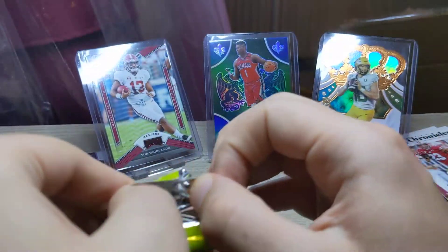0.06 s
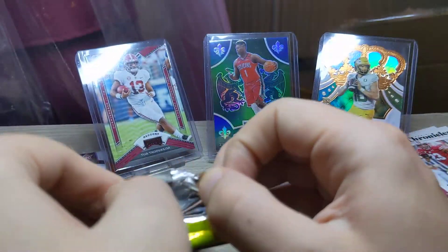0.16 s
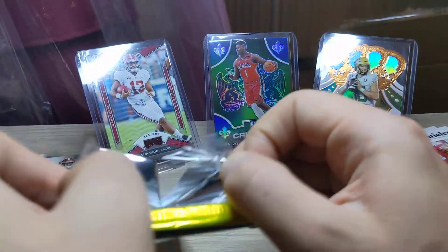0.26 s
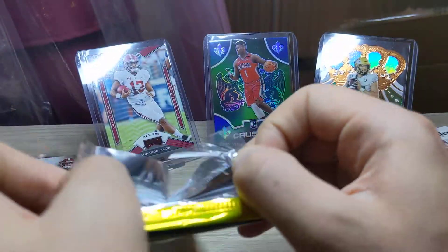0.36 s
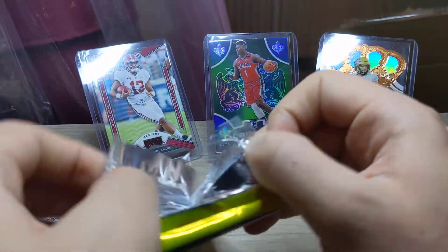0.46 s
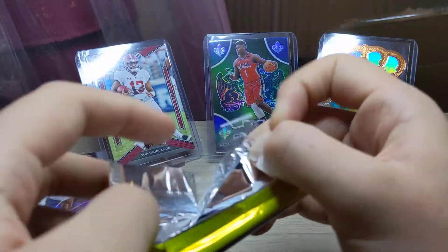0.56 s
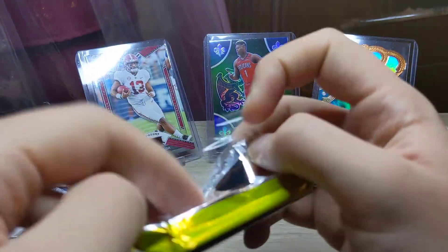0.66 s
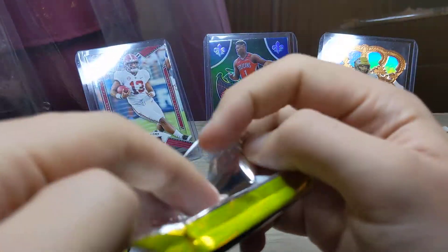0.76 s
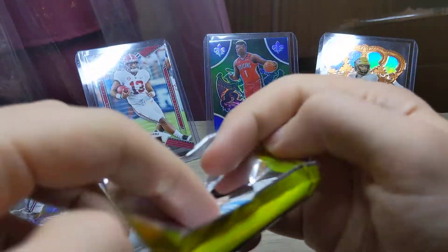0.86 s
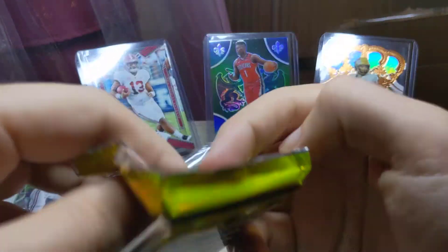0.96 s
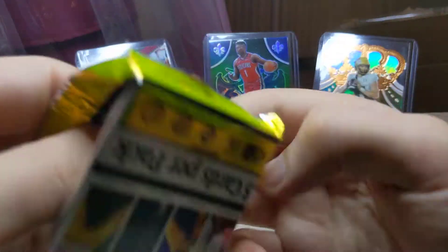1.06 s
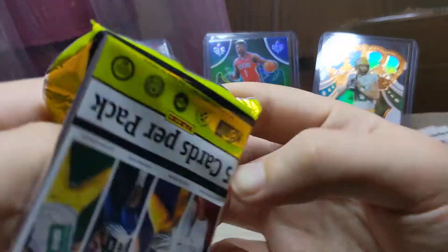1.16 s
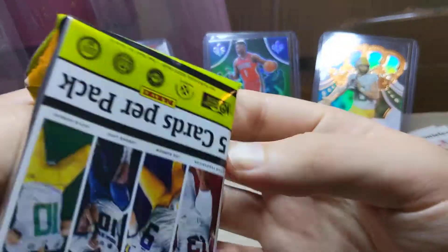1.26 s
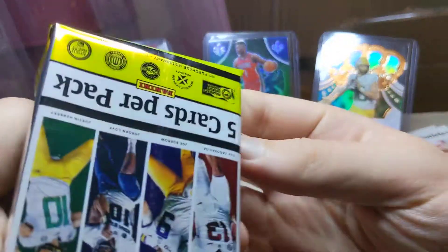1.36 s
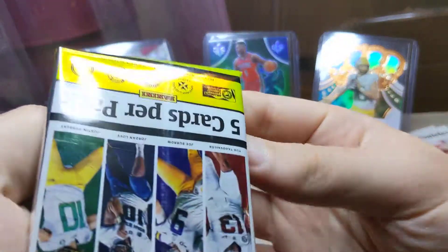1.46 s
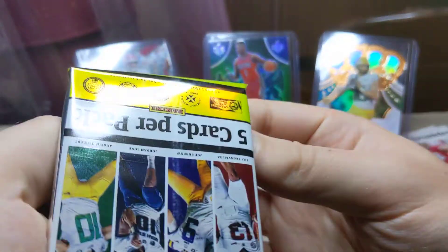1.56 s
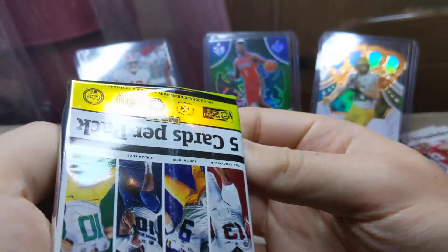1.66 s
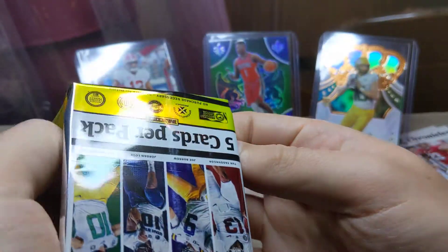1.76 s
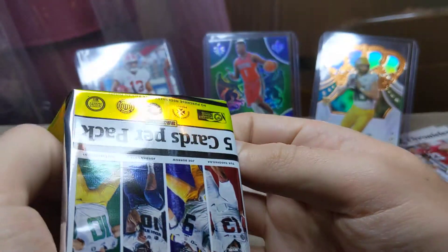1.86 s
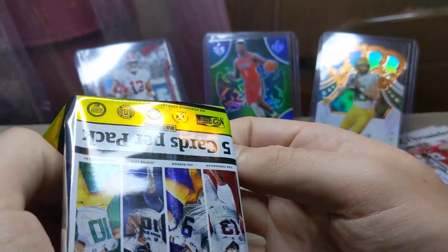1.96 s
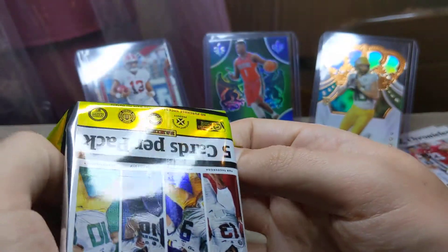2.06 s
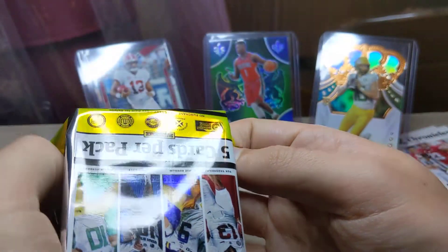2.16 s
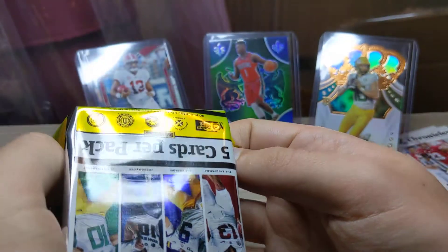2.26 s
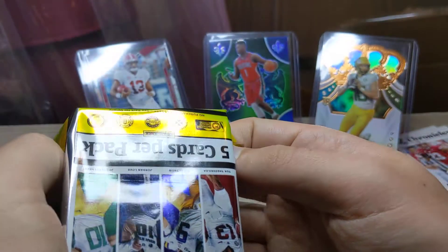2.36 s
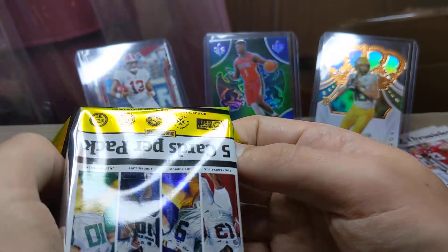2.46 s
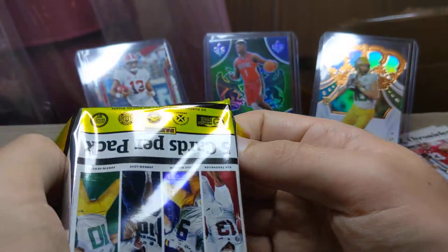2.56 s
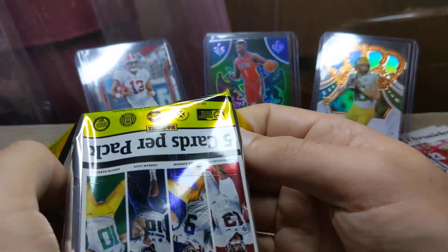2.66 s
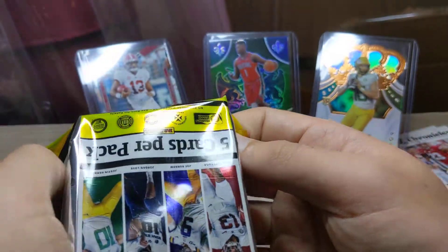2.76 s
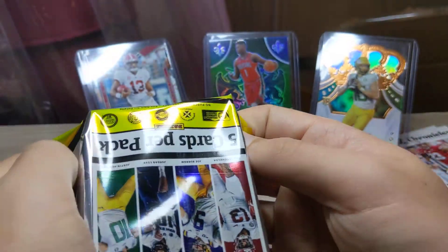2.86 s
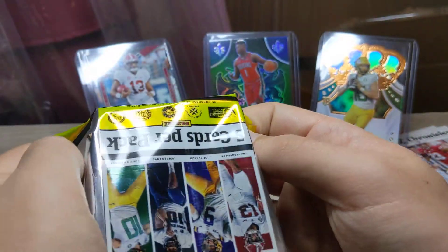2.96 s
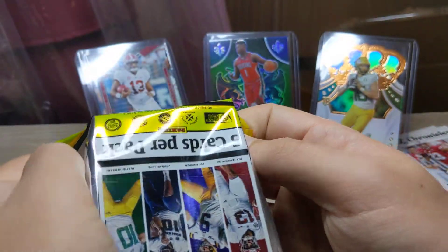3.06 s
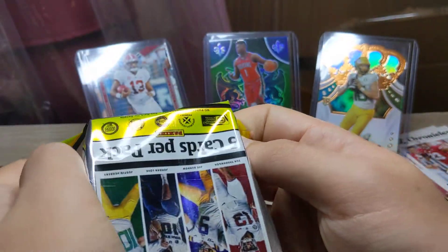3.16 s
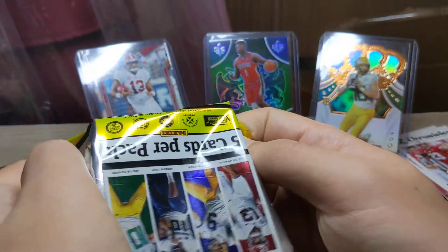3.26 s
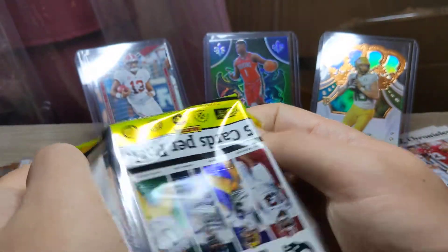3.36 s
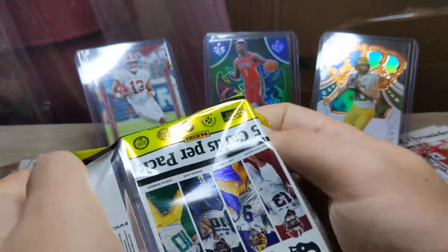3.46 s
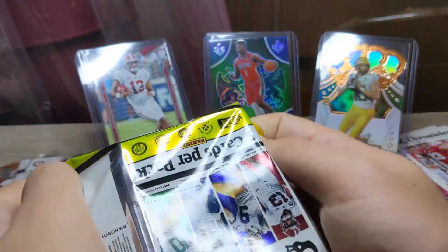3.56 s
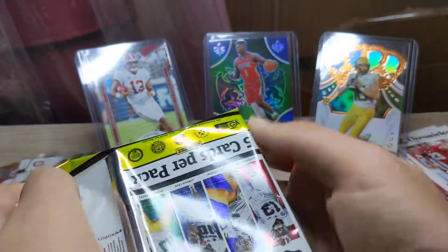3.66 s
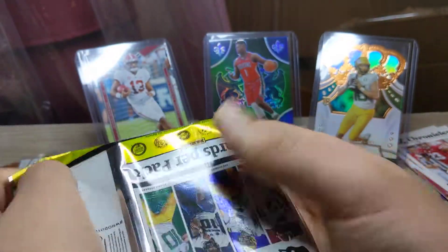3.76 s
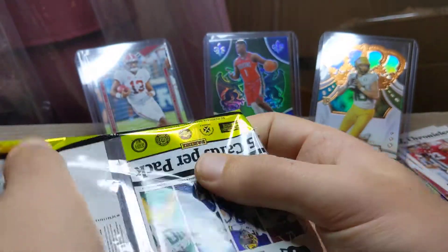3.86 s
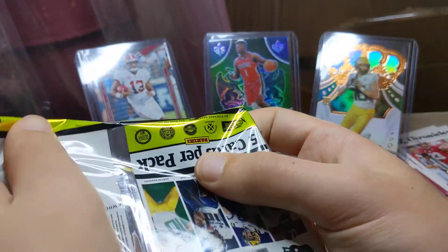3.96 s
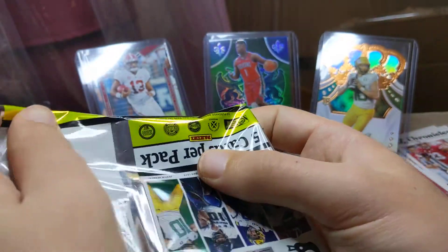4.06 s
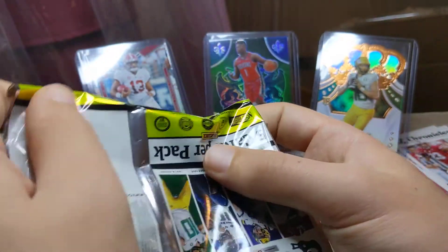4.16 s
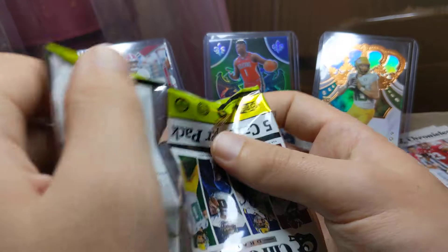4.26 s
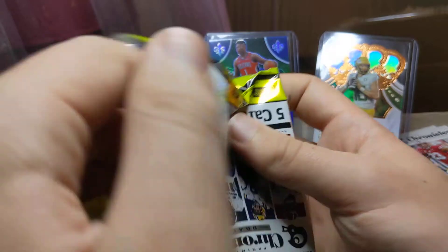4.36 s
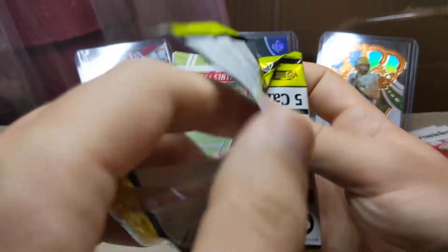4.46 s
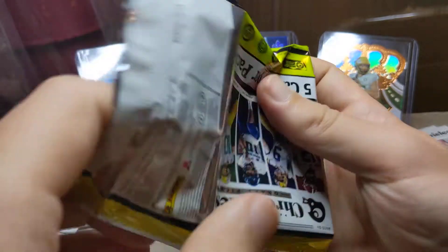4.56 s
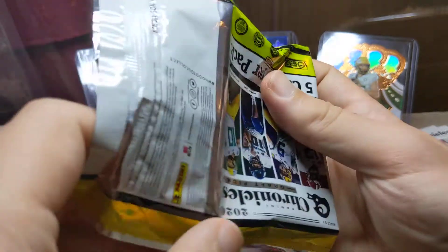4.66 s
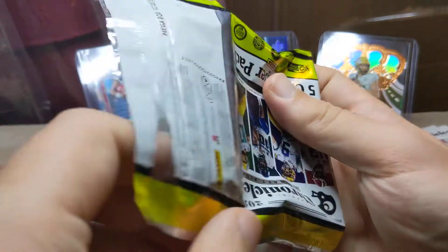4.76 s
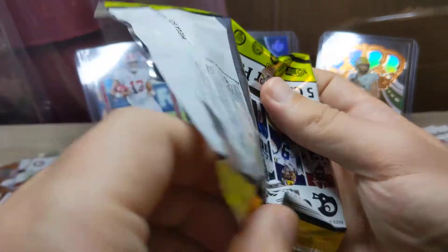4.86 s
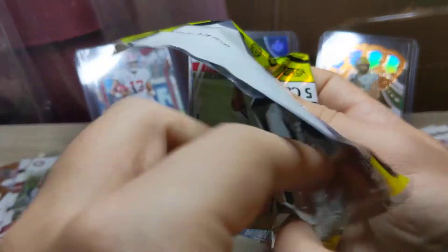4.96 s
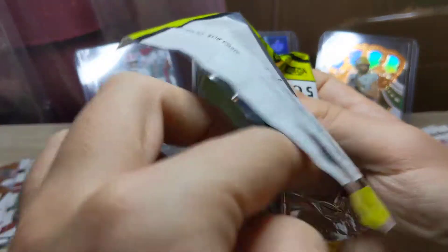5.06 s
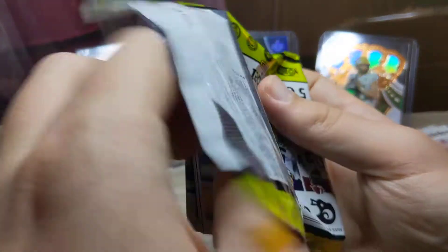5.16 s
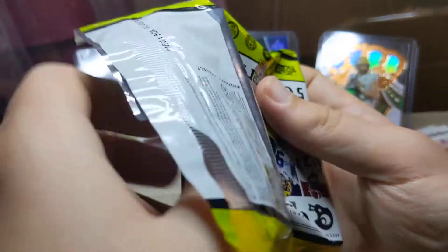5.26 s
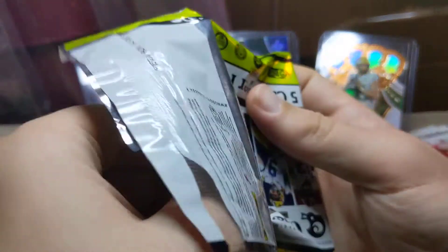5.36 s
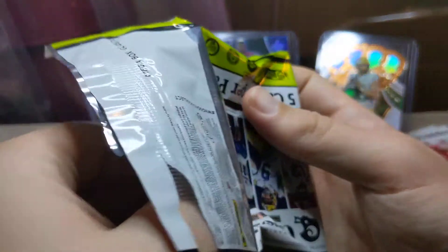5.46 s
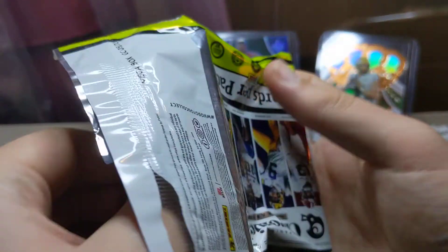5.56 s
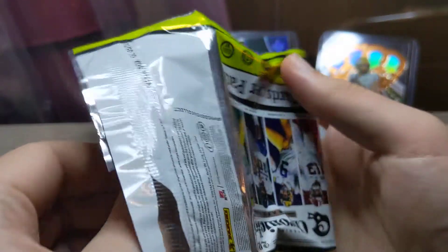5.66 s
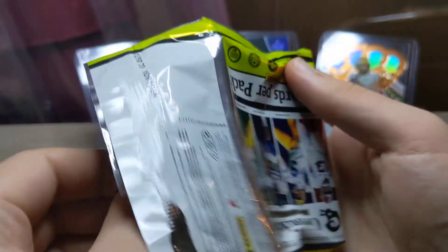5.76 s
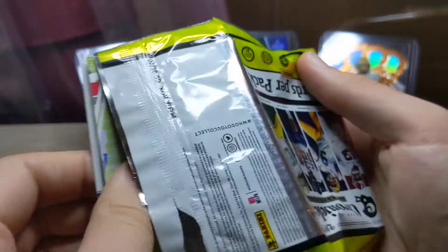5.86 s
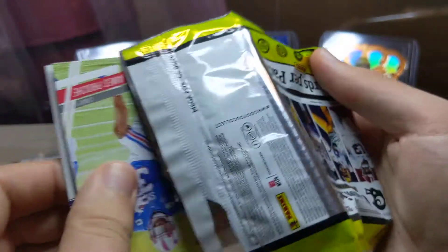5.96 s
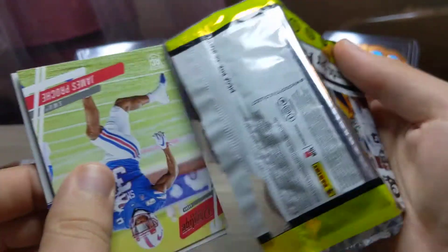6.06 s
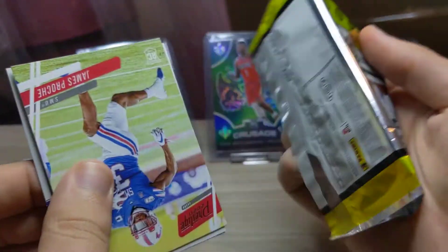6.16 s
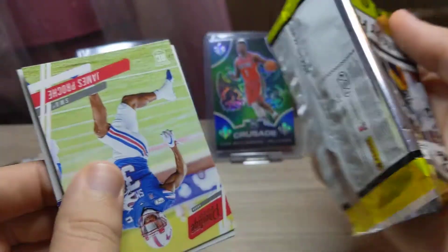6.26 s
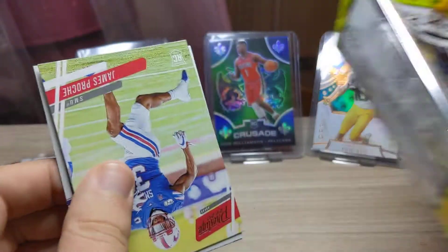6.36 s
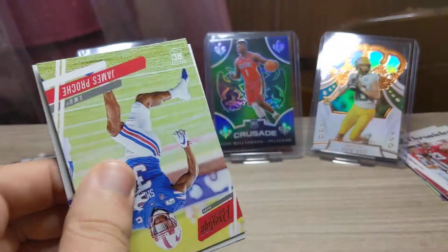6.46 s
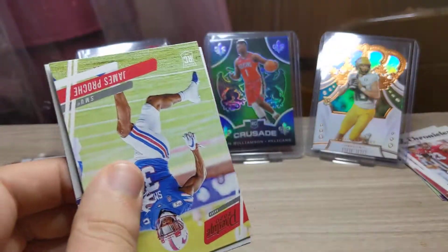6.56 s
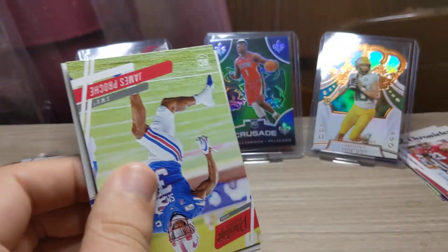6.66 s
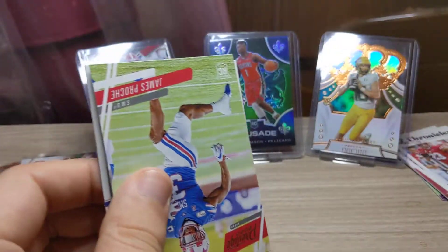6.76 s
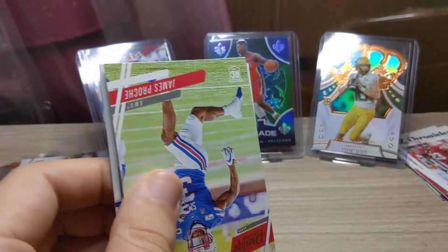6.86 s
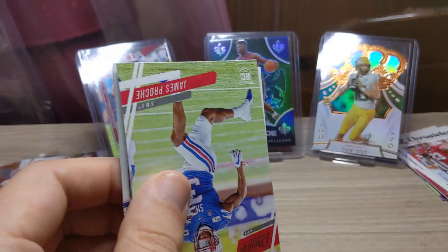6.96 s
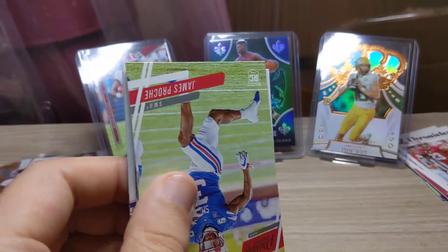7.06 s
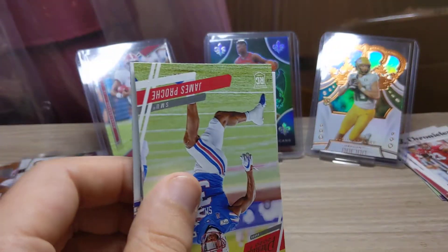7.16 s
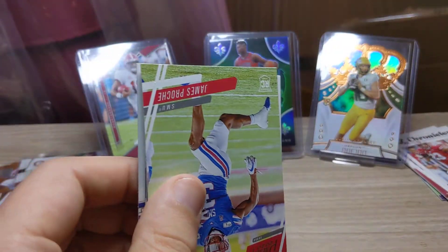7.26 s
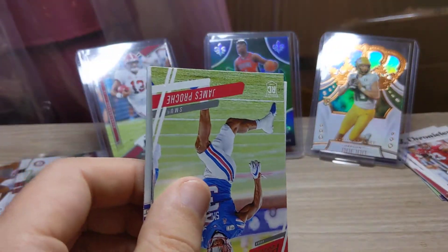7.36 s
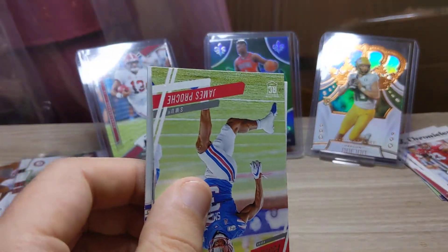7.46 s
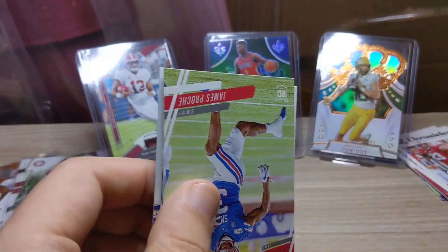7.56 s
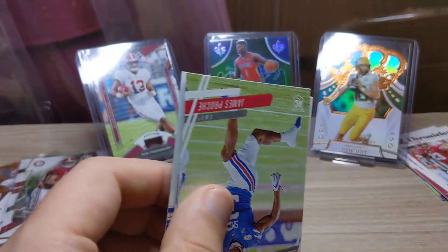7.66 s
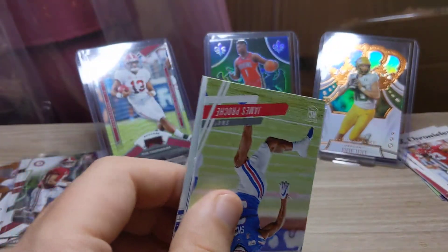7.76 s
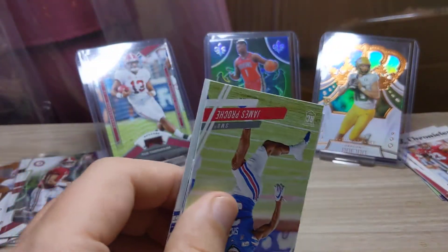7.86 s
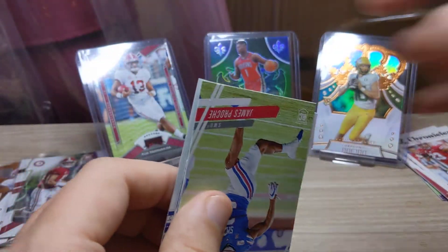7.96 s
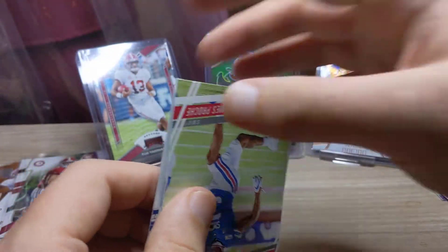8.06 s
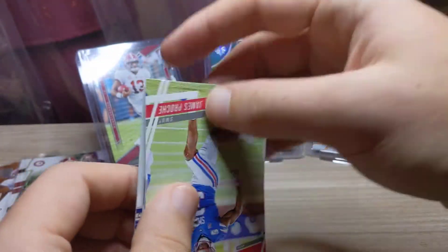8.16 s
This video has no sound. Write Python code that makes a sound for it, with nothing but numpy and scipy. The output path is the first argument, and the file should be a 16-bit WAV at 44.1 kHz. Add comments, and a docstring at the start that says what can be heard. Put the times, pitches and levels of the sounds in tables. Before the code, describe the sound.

Very close, dry stereo capture of foil packaging being opened. Quick bright ticks and hard cracks crowd the first few seconds, strongest as the packet is ripped. Lower soft thumps and rumbling flex join once it is open. Afterwards the foil only rustles lightly, leaning right for a moment, then nearly stops. One small muted card tap sounds before room rumble and hiss emerge.

```python
"""Hands tear and crumple a stiff foil pack close to a left and a right microphone port. Creases snap one by one
over a dense crackle of tiny noise bursts, the hollow pack answers lower down and a small room rings briefly.
After 3.5 s the torn pack gapes open and its walls flex with a low rumble. Later the foil is rubbed more than
crumpled, leaning to the right for a while. Near the end a stack of cards knocks softly, as a few fading tones
and a puff of noise, and the background rumble and hiss grow louder."""
import sys
import numpy as np
from scipy import signal
from scipy.fft import rfft, irfft, next_fast_len
from scipy.io import wavfile
from scipy.ndimage import map_coordinates

SR = 44100
rng = np.random.default_rng(int(sys.argv[2]) if len(sys.argv) > 2 else 0)


def generate_wav(signal):
    """Clip the signal to [-1, 1] and save it as 16-bit WAV at the path in sys.argv[1]."""
    frames = np.transpose(np.atleast_2d(signal))
    scaled = np.clip(frames, -1, 1) * 32767
    pcm = np.round(scaled).astype(np.int16)
    wavfile.write(sys.argv[1], SR, pcm)


N = 361619  # length in samples, about 8.2 s

# Low rumble and room hiss. Each row: time in seconds, rumble level in dB, hiss level in dB before a fixed lift.
AIR_LEVELS = [(0.0, -65, -79), (6.03, -70.5, -71), (8.2, -58, -65)]
# Colour of the low rumble. Each row: frequency in Hz, level in dB per Hz.
RUMBLE_COLOUR = [(12, -13), (22, 0.5), (29, -15), (42, -10.5), (58, -4), (90, -30), (200, -48.5)]
# Colour of the room hiss. Each row: frequency in Hz, level in dB per Hz.
HISS_COLOUR = [(47, -40.5), (80, -12.5), (240, -8), (500, -12), (940, -10), (1500, -16.5), (2200, -21),
               (5000, -36.5), (7500, -67), (11000, -40), (16000, -44)]
# How alike steady noise is at both ports. Each row: frequency in Hz, likeness from 0 to 1.
LIKENESS = [(60, .87), (300, .85), (700, 0), (15000, 0)]
# How fast the room falls silent. Each row: frequency in Hz, time to fall by 60 dB in seconds.
ROOM_DECAY = [(200, 0.19), (2000, 0.19), (12000, 0.029)]
# Taps of the card stack. Each row: start in seconds, level in dB.
CARD_TAPS = [(7.728, -21.5)]
# Tones of the card stack. Each row: frequency in Hz, level in dB, time to fall by 60 dB in seconds.
CARD_TONES = [(315, -6, 0.044), (460, -2.5, 0.04), (625, 9, 0.017), (1010, 12.5, 0.0049)]
# Fingers bump the pack, then the cards. Each row: start in seconds, level in dB before a fixed lift,
# starting pitch in Hz.
FINGER_BUMPS = [(0.856, -46, 149), (3.428, -38, 193), (3.94, -46, 64), (4.086, -41, 161), (4.15, -44, 75),
                (4.178, -40.5, 202), (4.305, -35, 101), (4.369, -38, 208), (4.403, -34, 330),
                (4.712, -43, 121), (4.773, -35.5, 181), (5.537, -45, 106), (5.722, -42.5, 79),
                (7.6, -41.5, 182)]
# Colour of the flexing walls. Each row: frequency in Hz, level in dB per Hz.
FLEX_COLOUR = [(40, -17), (80, -2.5), (350, 0), (600, -30)]
# Colour of the pack's body. Each row: frequency in Hz, level in dB per Hz.
PACK_COLOUR = [(60, -12), (200, -11.5), (450, -5.5), (700, -0.5), (1200, 0.5), (1900, -4.5), (4000, -31)]
# Colour of the foil sheet. Each row: frequency in Hz, level in dB per Hz.
SHEET_COLOUR = [(600, -38.5), (1500, -7), (2800, -4.5), (4800, -1), (6500, -6), (9000, -24.5)]
# Colour of the thin bright edges. Each row: frequency in Hz, level in dB per Hz.
EDGE_COLOUR = [(4000, -36.5), (7500, -6), (9500, -1.5), (12000, -1), (16000, -6.5)]
# The hollow of the pack changes size as it is bent. Each row: time in seconds, middle ring pitch in Hz.
HOLLOW_PITCH = [(0, 830), (1.0, 850), (1.8, 1070), (2.9, 907), (4.3, 735)]
# The foil is crumpled, then rubbed and put aside. Each row: time in seconds, graininess from 0 to 1,
# left over right in dB.
WRAPPER_STATE = [(0, 1, .5), (4.9, 1, .5), (5.0, .85, 0), (6.3, .85, 0), (6.6, .7, -9), (6.8, .75, -9),
                 (7.35, .85, -3), (7.45, .3, 0)]
# The steady grip between flurries. Each row: time in seconds, crackle level in dB, pack body level in dB.
GRIP_LEVELS = [(0, -49, -45), (.43, -54.5, -80), (0.901, -66, -56), (1.468, -54, -62), (1.997, -65, -49),
               (2.35, -52.5, -50), (2.9, -47.5, -51), (3.1, -72, -66), (3.55, -51, -49.5),
               (4.401, -46, -57.5), (4.72, -53.5, -53), (4.92, -73.5, -84), (5.15, -48, -66),
               (6.149, -67, -63), (6.85, -63, -72.5), (7.05, -73, -67.5), (7.6, -69.5, -56.5),
               (8.2, -85, -79)]
# Squeezes, pulls and rubs. Each row: start in seconds, hold in seconds, crackle level in dB,
# pack body level in dB.
SQUEEZES = [(0.022, 0.085, -40.5, -47), (0.312, 0.014, -25, -31), (0.527, 0.11, -48.5, -54.5),
            (0.7, 0.09, -47, -56), (0.835, .035, -35, -36.5), (0.925, 0.036, -37, -45),
            (0.994, 0.0038, -33, -47), (1.082, 0.031, -39.5, -53), (1.22, 0.0057, -33.5, -42.5),
            (1.272, .13, -42, -47.5), (1.564, 0.27, -45, -51.5), (1.923, 0.028, -39, -49.5),
            (2.042, 0.086, -41.5, -44.5), (2.197, 0.014, -37, -37.5), (2.32, 0.096, -58, -49.5),
            (2.492, 0.077, -40.5, -42.5), (2.661, 0.033, -30.5, -33), (2.694, 0.087, -47.5, -60.5),
            (2.999, 0.0079, -36.5, -42), (3.134, 0.014, -43, -52), (3.25, 0.0092, -45.5, -47.5),
            (3.363, 0.0074, -35, -43), (3.434, 0.028, -25.5, -25.5), (3.668, 0.072, -38.5, -49.5),
            (3.902, 0.11, -40, -48), (4.149, 0.039, -43, -48), (4.32, 0.0082, -42, -42.5),
            (4.386, 0.046, -37.5, -50.5), (4.568, 0.067, -42, -50.5), (4.776, 0.06, -45.5, -50.5),
            (4.98, 0.082, -42.5, -54), (5.194, 0.042, -45, -56), (5.551, 0.21, -41.5, -58),
            (5.857, 0.03, -39, -44.5), (5.935, 0.16, -50.5, -57.5), (6.366, 0.061, -54, -58),
            (6.602, 0.0063, -43.5, -49), (6.658, 0.15, -57, -75), (7.111, 0.22, -59, -63),
            (7.594, 0.03, -50, -51.5)]
# Creases that snap. Each row: start in seconds, sheet level in dB, pack body level in dB, bright edge level in dB.
CREASES = [(0.0259, -26.5, -44.5, -24.5), (0.0506, -23.5, -36.5, -22.5), (0.087, -24, -64, -21.5),
           (0.119, -32, -62.5, -23), (0.1548, -32, -38.5, -41.5), (0.2153, -28, -32.5, -35),
           (0.2315, -22, -47, -25), (0.2993, -19.5, -28.5, -32), (0.322, -13.5, -38, -17.5),
           (0.3436, -22, -31.5, -20.5), (0.4407, -43.5, -55, -33), (0.459, -31, -49, -39),
           (0.5155, -39, -40, -37), (0.5401, -24.5, -42, -19), (0.633, -31.5, -64, -31),
           (0.7443, -52, -67, -37), (0.7512, -45, -40, -48), (0.788, -37, -54, -33),
           (0.7977, -28, -43, -30), (0.8093, -43, -29, -48), (0.8147, -19.5, -34.5, -27),
           (0.8864, -35, -33.5, -41), (0.9121, -15.5, -33, -26), (0.9159, -21.5, -33, -23),
           (0.977, -37, -31, -36), (0.9969, -9.5, -25, -21), (1.001, -19, -27.5, -36),
           (1.01, -30, -47, -23), (1.0227, -22, -50, -35), (1.0512, -19.5, -58, -17),
           (1.0901, -34, -50, -25), (1.109, -24, -36, -28), (1.1272, -23.5, -35, -34),
           (1.1535, -25.5, -40, -25), (1.2015, -27.5, -49, -27), (1.2336, -17, -44, -17.5),
           (1.2588, -21, -56, -14), (1.3433, -27.5, -56, -37), (1.382, -38, -59, -28.5),
           (1.392, -27.5, -46, -33), (1.4235, -29, -48, -31), (1.477, -58, -66, -44),
           (1.5428, -16, -44, -23.5), (1.5463, -23.5, -41, -31), (1.5733, -18, -44, -26),
           (1.5964, -53, -57, -35), (1.695, -24.5, -53, -24), (1.712, -25, -39.5, -22),
           (1.7165, -20, -41, -34), (1.7325, -9, -30, -10.5), (1.7991, -20, -66, -18),
           (1.8091, -10, -24.5, -12), (1.8227, -21, -31.5, -22), (1.8653, -18.5, -37.5, -13),
           (1.8843, -31, -57, -20), (1.9009, -32, -48, -23), (1.9772, -26, -46, -28.5),
           (2.034, -23, -38.5, -19.5), (2.1135, -21, -35.5, -26), (2.2136, -18.5, -32, -24),
           (2.3533, -46, -39.5, -49), (2.4367, -23.5, -46, -27), (2.4477, -33, -52, -52),
           (2.4818, -46, -29, -49), (2.5097, -27, -50, -38), (2.517, -24.5, -25.5, -22),
           (2.538, -25, -54, -34), (2.551, -24, -27, -28.5), (2.5558, -16, -33, -25),
           (2.612, -19, -36, -16.5), (2.6763, -4, -25, -17), (2.7276, -22.5, -44, -26),
           (2.8726, -12, -20.5, -35), (2.876, -12.5, -20.5, -11), (2.9784, -28, -34.5, -30.5),
           (2.9898, -29, -58, -28), (3.0086, -25.5, -42, -23), (3.1023, -26.5, -38, -25),
           (3.1112, -26.5, -41, -26.5), (3.1153, -18.5, -20.5, -12.5), (3.2212, -33.5, -48, -32.5),
           (3.2559, -32.5, -53.5, -36), (3.3532, -30, -55, -26), (3.3697, -14, -34, -21),
           (3.38, -30, -43, -28), (3.4132, -18, -26.5, -17), (3.4389, -31, -21.5, -8),
           (3.4459, -14.5, -16.5, -18), (3.4857, -19, -31, -15), (3.6782, -14, -33, -29),
           (3.683, -23, -27, -20), (3.7112, -26, -37.5, -32), (3.732, -24, -56, -36),
           (3.7362, -17, -40, -22), (3.7485, -23, -43, -21), (3.8482, -28, -47, -42),
           (3.8862, -26.5, -40.5, -30), (3.919, -35, -41, -26), (3.9305, -29, -32.5, -31),
           (3.9523, -27.5, -41, -24), (3.9585, -29, -31.5, -37), (3.9789, -19, -35, -20),
           (3.9832, -21, -29.5, -12.5), (3.9998, -22, -32, -30), (4.0218, -17, -30.5, -23),
           (4.0303, -22, -45, -26), (4.0497, -23.5, -33, -21), (4.093, -35, -40, -33),
           (4.1526, -28, -28, -37), (4.1644, -30, -32, -43), (4.1742, -28, -32.5, -25),
           (4.189, -20.5, -29, -15.5), (4.2125, -26, -41, -29), (4.228, -25, -37, -26),
           (4.2429, -23, -28.5, -16.5), (4.2499, -18.5, -35, -24), (4.3005, -28.5, -33, -39),
           (4.3042, -23, -34.5, -24), (4.37, -18, -33, -26), (4.3738, -18, -33.5, -14),
           (4.4065, -15.5, -26.5, -11), (4.4465, -30, -53, -29), (4.4693, -24, -43.5, -25),
           (4.5624, -29, -47, -34), (4.5739, -11.5, -41.5, -23), (4.6137, -23, -39, -22),
           (4.6248, -32, -38, -41), (4.7485, -27.5, -42, -39), (4.7745, -19, -34.5, -19),
           (4.7843, -15, -24.5, -24.5), (4.8086, -18, -40, -12.5), (4.9026, -34, -46, -38),
           (4.9352, -29, -55, -49), (4.961, -32.5, -44, -45), (5.0312, -23.5, -49, -19),
           (5.0598, -24.5, -38, -31), (5.158, -21.5, -40.5, -26.5), (5.2236, -30.5, -40, -45),
           (5.2305, -20.5, -38, -29), (5.4945, -27.5, -37, -51), (5.5438, -35, -38, -42),
           (5.5593, -33, -56, -43), (5.6077, -38, -39.5, -41), (5.6236, -25.5, -65, -30),
           (5.6502, -31.5, -44, -44), (5.6818, -26, -46, -42), (5.7338, -29, -39, -38),
           (5.7814, -28.5, -46, -34), (5.8377, -30, -40, -34), (6.0785, -29.5, -56, -32),
           (6.2887, -33, -44.5, -41.5), (6.4387, -28, -47, -29), (6.553, -41, -63, -38),
           (6.5697, -33, -46, -33), (6.6834, -37, -58, -32), (6.71, -27.5, -53, -28.5),
           (6.7863, -30.5, -52, -34), (6.8944, -45, -59, -53), (6.946, -45.5, -55, -54),
           (7.058, -33.5, -69, -34.5), (7.1337, -41, -62, -41), (7.1604, -43, -66, -47),
           (7.2073, -56, -63, -51), (7.2687, -57.5, -61, -45)]

TOP_HZ = 16000  # the recorder's band limit
RISE_DB_PER_S, FALL_DB_PER_S = 430, 340  # how fast a flurry swells and dies
OPEN_S, OPENING_S = 3.54, 0.38  # when the torn pack starts to gape, and how long that takes
FLEX_DB = -10  # flexing, compared with the pack body level
BUSY = 0.3  # share of a harder squeeze (in dB) that makes more creases instead of louder ones
FLIP_S = 0.0003  # rise time of a snapping crease
JOLT = 0.45  # share of the flip's noise that is one dry jolt
CREEP_S, CREEP_DB = 0.003, -15  # a crease creaks this long before it flips; level the creak grows to
PORT_LAG = 5  # samples by which the right port hears the foil later


def amp(db):
    """Turn dB into a gain."""
    return 10 ** (np.asarray(db) / 20)


def unit(x):
    """Scale to an rms (average strength) of 1."""
    return x / np.sqrt(np.mean(x ** 2) + 1e-20)


def along(points, hz):
    """Read (Hz, value) points at any frequency, on a log axis."""
    f, v = np.transpose(points)
    return np.interp(np.log(hz + 1), np.log(f + 1), v)


def curves(rows, s):
    """Read each column after the time at times s."""
    knots, *cols = np.transpose(rows)
    return [np.interp(s, knots, c) for c in cols]


def wobble(rate):
    """A smooth random curve with this many knots a second."""
    knots = rng.standard_normal(int(N * rate / SR) + 4)
    return map_coordinates(knots, [np.arange(N) * rate / SR])


def coloured(x, spectrum):
    """Filter x to a spectrum, with energy 1 and nothing sounding ahead of its cause."""
    cepstrum = irfft(np.log(amp(along(spectrum, np.fft.rfftfreq(4096, 1 / SR)))))
    # folding the second half onto the first puts the energy as early as possible
    cepstrum[1:2048] *= 2
    cepstrum[2049:] = 0
    kernel = irfft(np.exp(rfft(cepstrum)))
    return signal.fftconvolve(x, kernel[None] / np.linalg.norm(kernel), axes=1)[:, :N]


def rush(spectrum):
    """Steady stereo noise of rms 1, as alike at both ports as LIKENESS says."""
    m = next_fast_len(N)
    hz = np.fft.rfftfreq(m, 1 / SR)
    turn = np.arccos(np.clip(along(LIKENESS, hz), -1, 1)) / 2
    white = rfft(rng.standard_normal((2, m)))
    shares = [np.cos(turn), np.sin(turn)]
    mid, side = irfft(white * amp(along(spectrum, hz)) * shares, m)[:, :N]
    return unit(np.array([mid + side, mid - side]))


def handling(s):
    """Crackle and pack body levels (dB) at times s: flurries swell, hold and die over the steady grip."""
    start, hold, *peaks_db = np.transpose(SQUEEZES)[:, :, None]
    knots = np.arange(0, N / SR, 0.002)
    rise_loss_db = RISE_DB_PER_S * np.clip(start - knots, 0, None)
    fall_loss_db = FALL_DB_PER_S * np.clip(knots - start - hold, 0, None)
    levels = []
    for grip_db, peak_db in zip(curves(GRIP_LEVELS, knots), peaks_db):
        flurries = amp(2 * (peak_db - rise_loss_db - fall_loss_db)).sum(axis=0)
        power = amp(2 * grip_db) + flurries
        levels.append(np.interp(s, knots, 10 * np.log10(power)))
    return levels


def air():
    """Low building rumble and the room's hiss: steady noises with slowly moving levels."""
    rumble_db, hiss_db = curves(AIR_LEVELS, np.arange(N) / SR)
    return amp(rumble_db) * rush(RUMBLE_COLOUR) + amp(hiss_db + 6.5) * rush(HISS_COLOUR)


def room(x):
    """The room answers with a tail of noise in which each frequency dies at its own speed."""
    hz, t, z = signal.stft(rng.standard_normal((2, SR // 3)), SR, nperseg=256)
    decay = amp(-60 * t / along(ROOM_DECAY, hz)[:, None])
    tail = signal.istft(z * decay, SR, nperseg=256)[1]
    delayed = np.pad(x, ((0, 0), (150, 0)))  # 150 samples, about 3.4 ms
    return signal.fftconvolve(delayed, tail / np.linalg.norm(tail[0]), axes=1)[:, :N]


def taps():
    """The card stack rings in a few low tones as it knocks, and noise puffs out from between the cards."""
    out, t = np.zeros(N + SR), np.arange(SR // 4) / SR
    for s, db in CARD_TAPS:
        ring = sum(amp(level - 60 * t / t60) * np.sin(2 * np.pi * hz * t) for hz, level, t60 in CARD_TONES)
        knock = ring * (1 - np.exp(-(t / 0.0024) ** 2))
        puff_level = amp(-35.5 - 60 * t / 0.21) + amp(-43 - 60 * t / 0.04)
        puff = puff_level * rng.standard_normal(len(t))
        out[round(s * SR):][:len(t)] += amp(db) * knock
        out[round((s - 0.008) * SR):][:len(t)] += amp(db) * puff  # the air leaves just before the contact
    return out[:N] * amp([[0.7], [-0.7]])  # slightly to the left


def bumps():
    """Each bump is one soft low push that sags in pitch as the finger settles."""
    out, t = np.zeros(N + SR), np.arange(SR // 8) / SR
    for s, db, hz in FINGER_BUMPS:
        push = np.sin(2 * np.pi * hz * t / (1 + 8 * t)) * (1 - np.exp(-t / 0.0047))
        out[round(s * SR):][:len(t)] += amp(db + 11.5 - 60 * t / 0.024) * push
    return out[:N] * amp([[0.6], [-0.6]])  # slightly to the left


def flex():
    """Once the pack is open, its loose walls flex with an uneven low rumble."""
    s = np.arange(N) / SR
    opened = np.clip((s - OPEN_S) / OPENING_S, 0, 1)
    gape = opened * curves(WRAPPER_STATE, s)[0] ** 4  # rubbing hardly bends the walls
    uneven_db = 7.5 * np.tanh(wobble(30))
    return gape * amp(handling(s)[1] + FLEX_DB + uneven_db) * rush(FLEX_COLOUR)


def rub():
    """Skin slides on foil: an even rustle of noise that takes over as the graininess falls."""
    s = np.arange(N) / SR
    sheet_db, pack_db = handling(s)
    grain, pan_db = curves(WRAPPER_STATE, s)
    slide_db = -12 * grain
    shared = rng.standard_normal(N + PORT_LAG)
    body = amp(pack_db + slide_db) * np.array([shared[PORT_LAG:], shared[:-PORT_LAG]])
    level = amp(sheet_db + slide_db + np.outer([1, -1], pan_db / 2))
    flutter = amp(1.97 * np.array([wobble(25), wobble(25)]))[:, None]
    sheet, edge = level * flutter * rng.standard_normal((2, 2, N))
    rustle = coloured(sheet, SHEET_COLOUR) + amp(-2.5) * coloured(edge, EDGE_COLOUR)
    return amp(-1.0) * coloured(body, PACK_COLOUR) + rustle


def bursts(s, db, pan_db, hz, t60, ring, alike, rise, size):
    """Short bursts at two ports: a creak, a jolting flip that rings one facet, then a fainter, longer rattle."""
    before = np.arange(size) / SR - CREEP_S  # negative until the flip
    t = np.clip(before, 0, None)
    noise = rng.standard_normal((len(s), 3, size))
    phase = rng.uniform(size=(len(s), 3, 1))
    facet = np.sqrt(2) * np.sin(2 * np.pi * (hz[:, None, None] * t + phase))
    onset = 1 - np.exp(-(t / rise) ** 2)
    flip = onset * amp(-60 * t / t60)
    rattle = 0.13 * onset * amp(-60 * t / (5 * t60))
    creak = amp(CREEP_DB) * (1 - onset) * np.clip(1 + before / CREEP_S, 0, 1) ** 2
    noise_level = np.sqrt((1 - ring) * (1 - JOLT)) * flip + rattle + creak
    waves = np.sqrt(ring) * flip * facet + noise_level * noise
    # the jolt is a single sample, pushing up or down at random
    jolt = np.sqrt((1 - ring) * JOLT / 2) * np.linalg.norm(flip)
    waves[:, :, np.argmax(flip)] += jolt * np.sign(noise[:, :1, 0])
    shared, left, right = waves.transpose(1, 0, 2)
    first = np.clip(np.round((s - CREEP_S) * SR).astype(int), 0, None)
    place = first[:, None] + np.arange(size)
    out = []
    for own, side, lag in ((left, 1, 0), (right, -1, PORT_LAG)):
        mix = np.sqrt(alike) * shared + np.sqrt(1 - alike) * own
        wave = amp(db + side * pan_db / 2)[:, None] * mix
        out.append(np.bincount((place + lag).ravel(), wave.ravel(), N + size + 8)[:N])
    return np.array(out)


def foil(s, sheet_db, pack_db, edge_db, facet_hz, t60, rise, size):
    """A buckling crease shakes the sheet, the hollow pack (most alike at both ports) and the thin edges."""
    draws = rng.standard_normal((len(s), 3))
    pan_db = curves(WRAPPER_STATE, s)[1] + 4.56 * draws[:, 0]
    hollow_hz = curves(HOLLOW_PITCH, s)[0] * amp(2.3 * draws[:, 1])
    rim_hz = 11000 * amp(1.3 * draws[:, 2])
    # ring is the share of tone against noise, alike the share common to both ports
    pack = bursts(s, pack_db, 0.17 * pan_db, hollow_hz, 2.3 * t60,
                  ring=0.22, alike=0.9, rise=2.27 * rise, size=size)
    sheet = bursts(s, sheet_db, pan_db + 3.0, facet_hz, t60,
                   ring=0.16, alike=0.39, rise=rise, size=size)
    edge = bursts(s, edge_db, pan_db - 3.5, rim_hz, 0.85 * t60,
                  ring=0.015, alike=0.22, rise=rise, size=size)
    return coloured(pack, PACK_COLOUR) + coloured(sheet, SHEET_COLOUR) + coloured(edge, EDGE_COLOUR)


def crackle(count, spiky_db, clump_db):
    """Many small creases in clumps, denser under a harder squeeze: most are faint, each has its own colour."""
    knots = np.arange(0, (N - 1) / SR, 0.002)
    density = amp(2 * BUSY * handling(knots)[0])
    density = density / density.mean()
    s = np.interp(rng.uniform(size=count), np.cumsum(density) / density.sum(), knots)
    at = (s * SR).astype(int)
    draws = rng.standard_normal((count, 4))
    # where creases are denser, each one is quieter
    sheet_db, pack_db = handling(s) - 10 * np.log10(np.interp(s, knots, density))
    smooth_db = 18 * (curves(WRAPPER_STATE, s)[0] - 1)  # a rubbed sheet creases less
    spike_db = spiky_db * (np.minimum(rng.exponential(size=count), 4.5) - 1)
    size_db = smooth_db + spike_db + clump_db * wobble(60)[at]
    # facets change size as the sheet folds
    facet_hz = 3500 * amp(2.61 * wobble(8.4)[at] + 2.8 * draws[:, 3])
    # the pack body pops in clusters of its own
    hollow_db = 4 * wobble(70)[at] + 2 * draws[:, 1] - 7 - 0.68 * size_db
    return foil(s, sheet_db + size_db + 3 * draws[:, 0], pack_db + size_db + hollow_db,
                sheet_db + size_db + 4 * draws[:, 2], facet_hz, t60=0.0025, rise=0.00013, size=400)


def snaps():
    """Single creases: each flips in about a millisecond, rings a facet of its own size and rattles out."""
    s, sheet_db, pack_db, edge_db = np.transpose(CREASES)
    facet_hz = 4200 * amp(2.18 * rng.standard_normal(len(s)))
    return foil(s, sheet_db, pack_db, edge_db, facet_hz, t60=0.0045, rise=FLIP_S, size=850)


def scene():
    """Hands, foil and cards close by, in a small room."""
    handled_foil = snaps() + crackle(count=4000, spiky_db=1.5, clump_db=5.5) + rub() + flex()
    near = handled_foil + taps() + bumps()
    return near + amp(-19) * room(near) + air()


def record(dry):
    """The recorder cuts steeply above its band limit, by 1 dB more for every 14 Hz."""
    m = next_fast_len(N + SR // 4)
    hz = np.fft.rfftfreq(m, 1 / SR)
    cut_db = -np.clip(hz - TOP_HZ, 0, None) / 14
    return irfft(rfft(dry, m) * amp(cut_db), m)[:, :N]


dry = scene()
out = record(dry)
generate_wav(out)
```